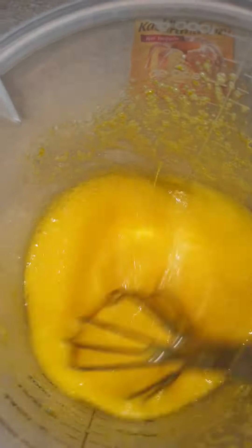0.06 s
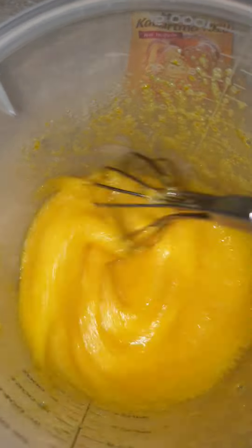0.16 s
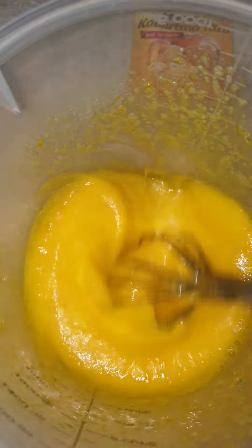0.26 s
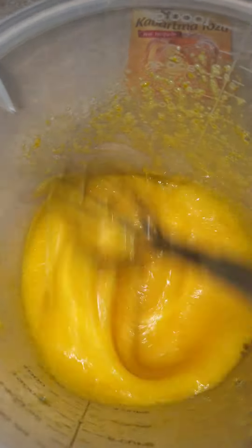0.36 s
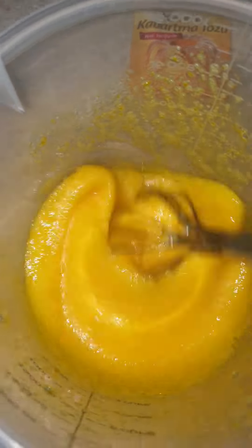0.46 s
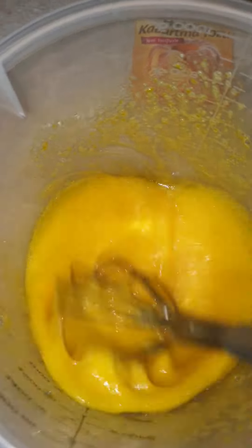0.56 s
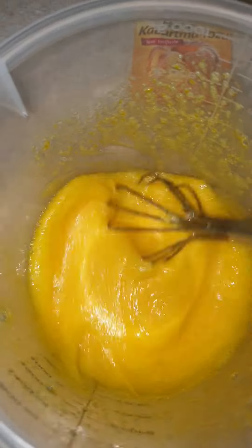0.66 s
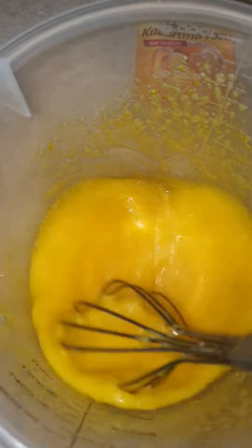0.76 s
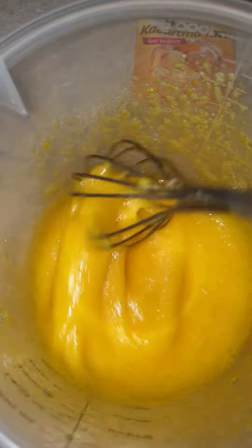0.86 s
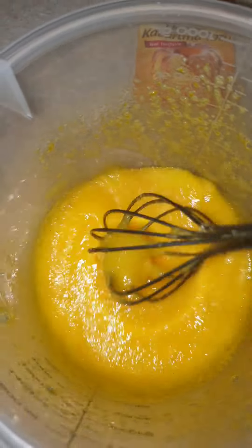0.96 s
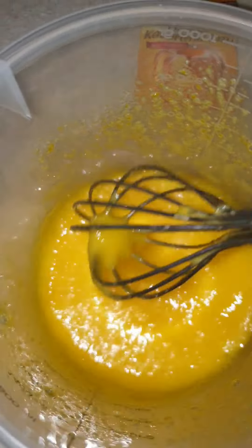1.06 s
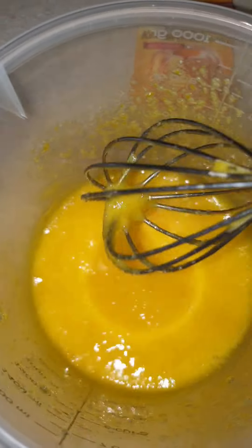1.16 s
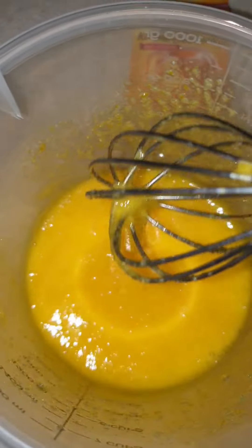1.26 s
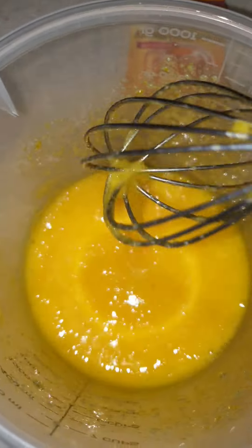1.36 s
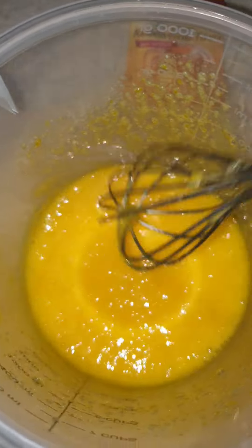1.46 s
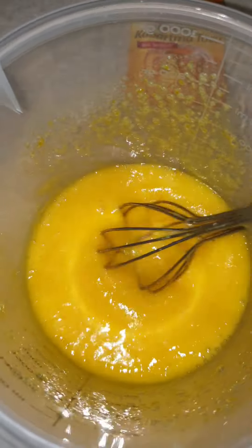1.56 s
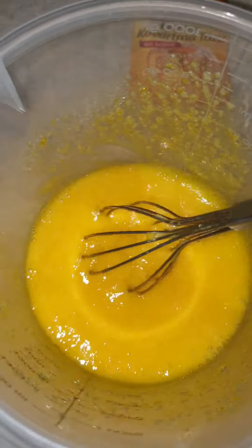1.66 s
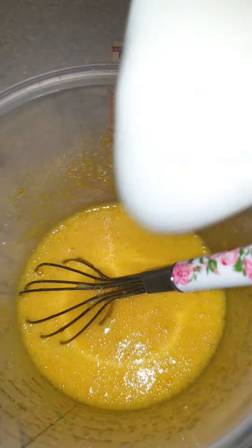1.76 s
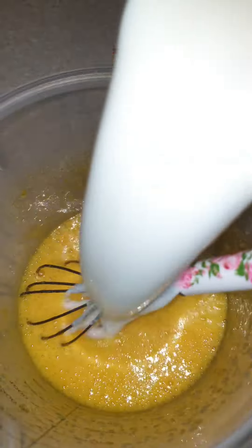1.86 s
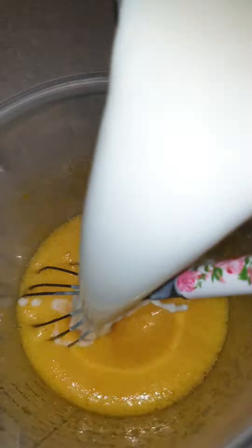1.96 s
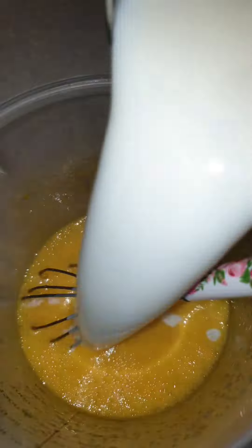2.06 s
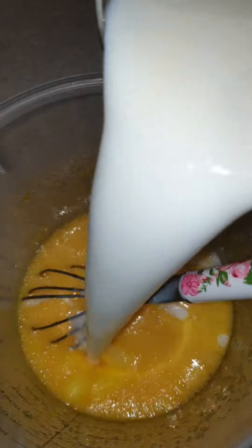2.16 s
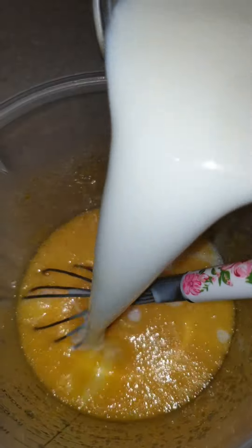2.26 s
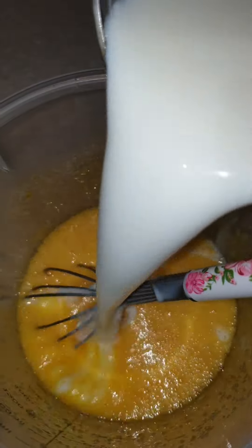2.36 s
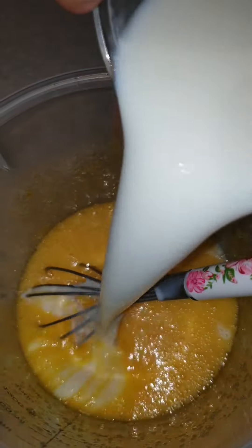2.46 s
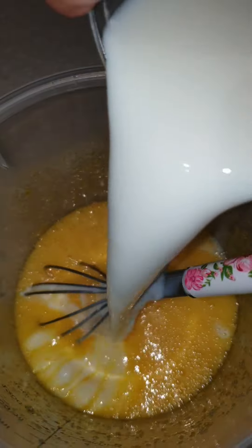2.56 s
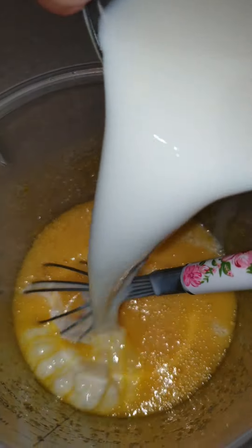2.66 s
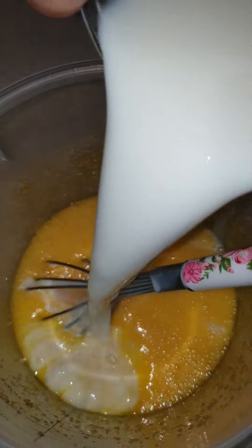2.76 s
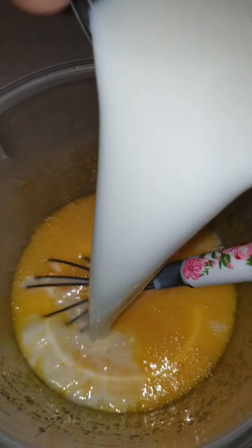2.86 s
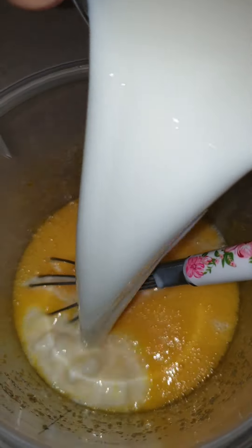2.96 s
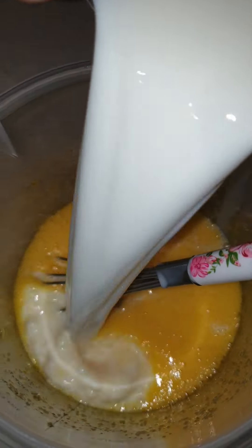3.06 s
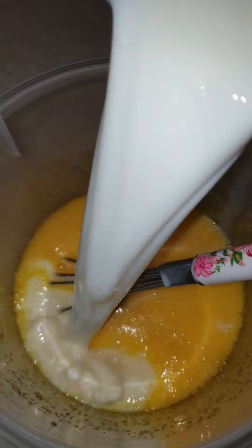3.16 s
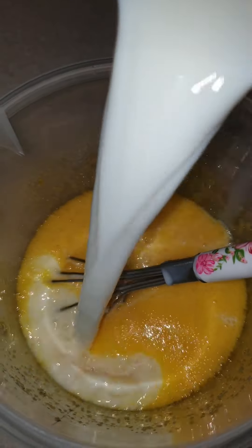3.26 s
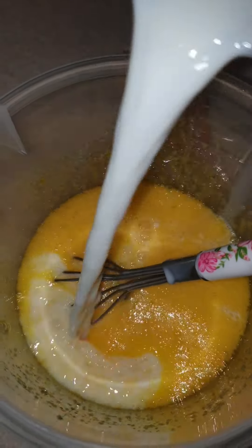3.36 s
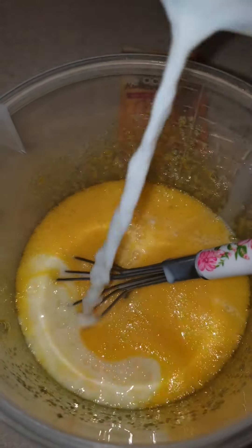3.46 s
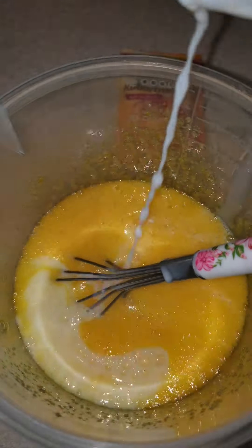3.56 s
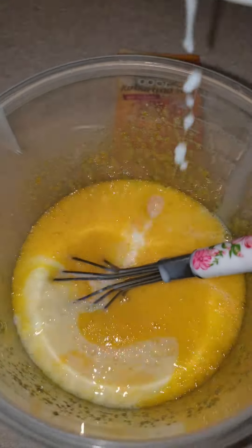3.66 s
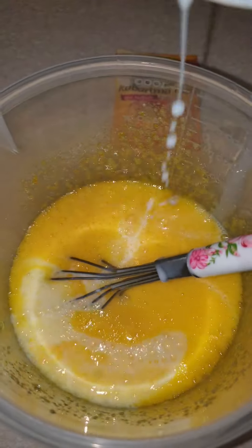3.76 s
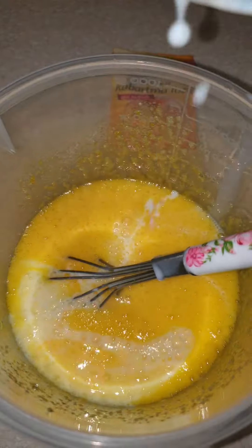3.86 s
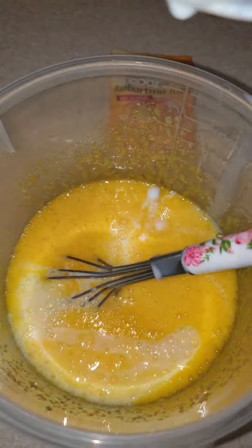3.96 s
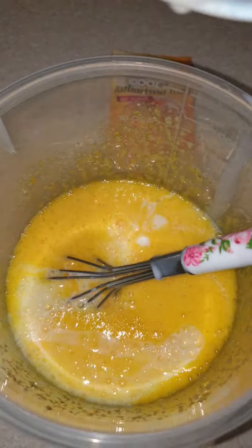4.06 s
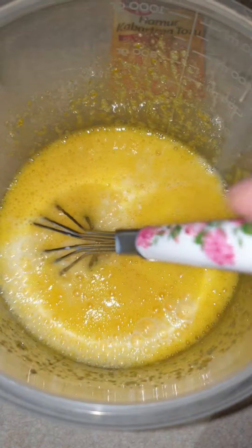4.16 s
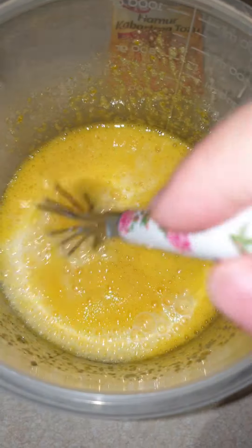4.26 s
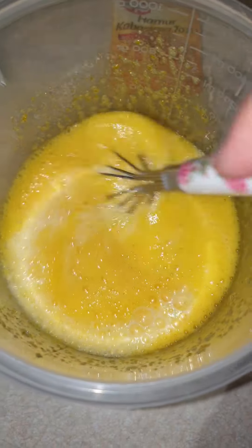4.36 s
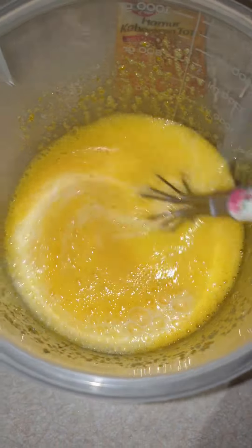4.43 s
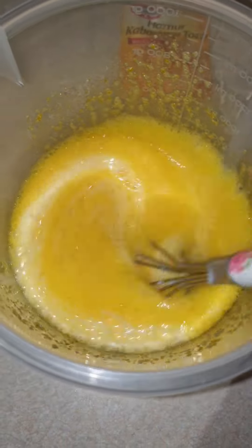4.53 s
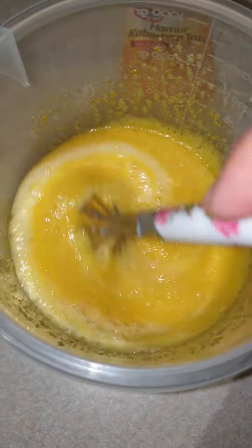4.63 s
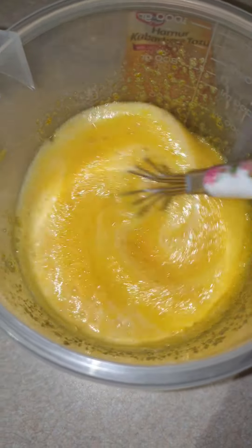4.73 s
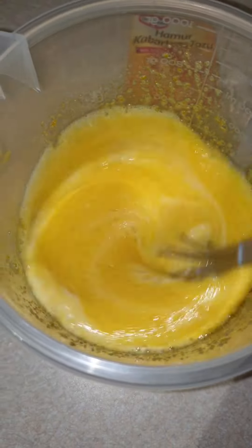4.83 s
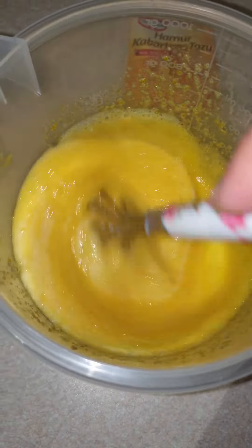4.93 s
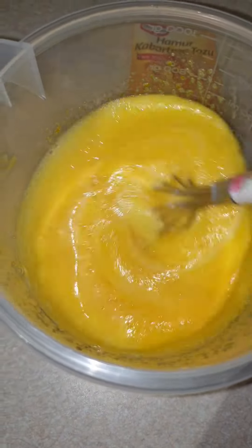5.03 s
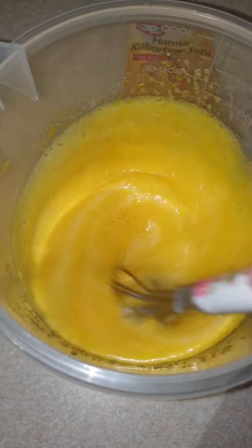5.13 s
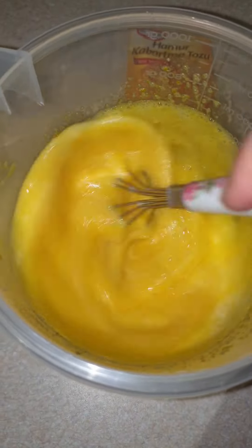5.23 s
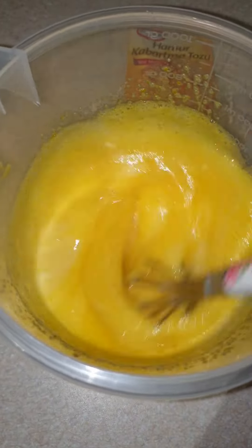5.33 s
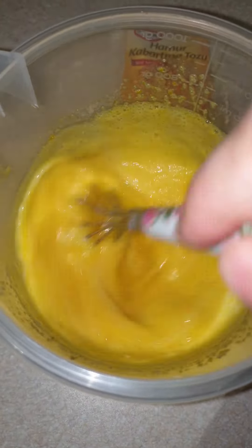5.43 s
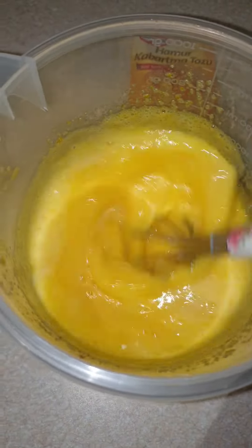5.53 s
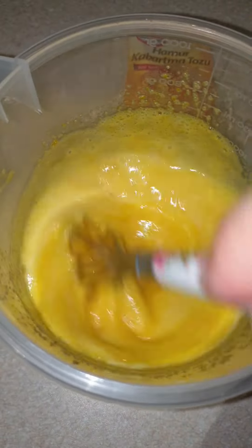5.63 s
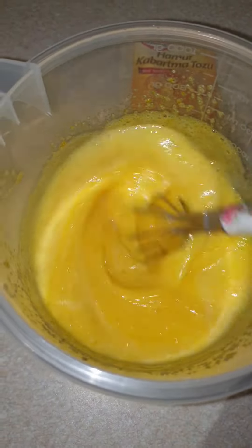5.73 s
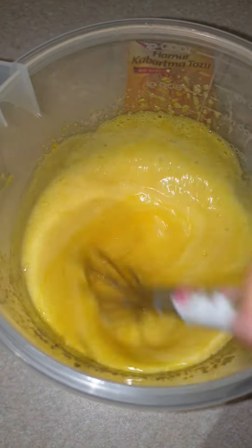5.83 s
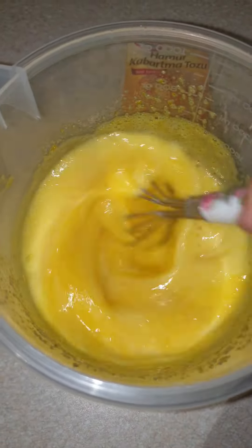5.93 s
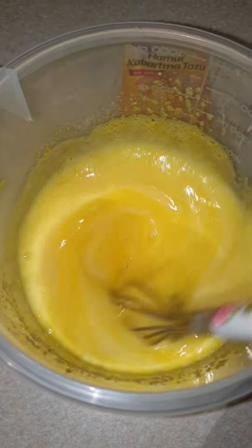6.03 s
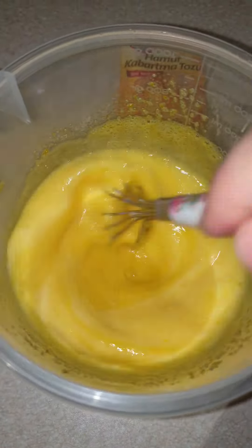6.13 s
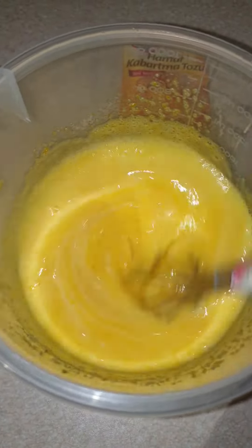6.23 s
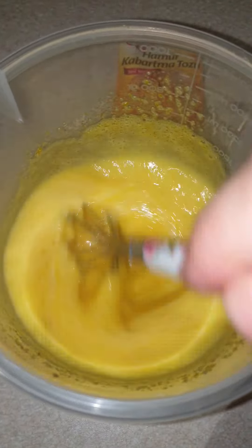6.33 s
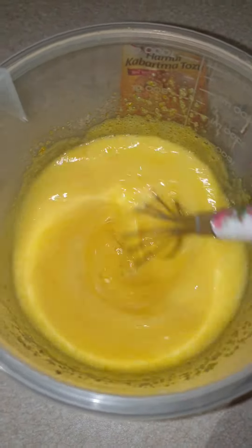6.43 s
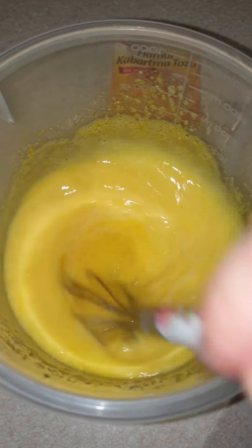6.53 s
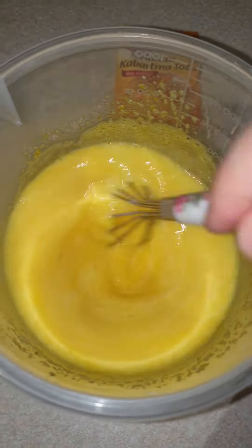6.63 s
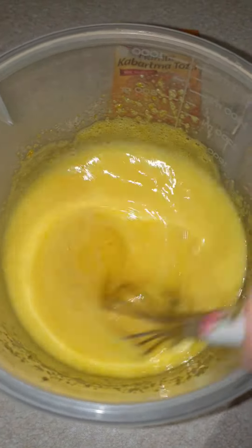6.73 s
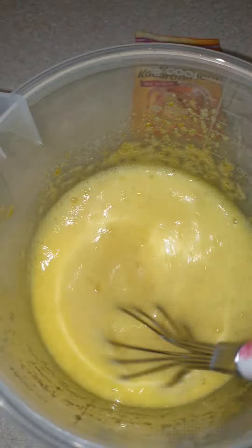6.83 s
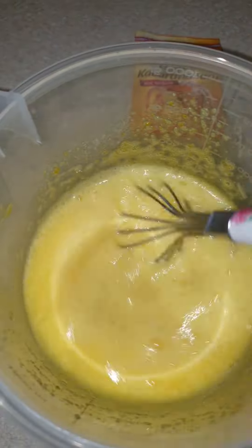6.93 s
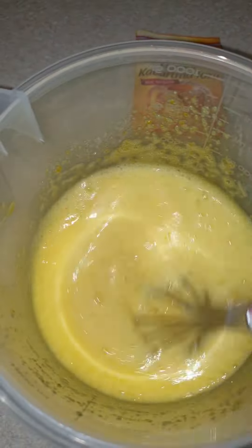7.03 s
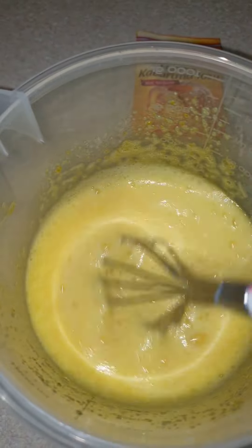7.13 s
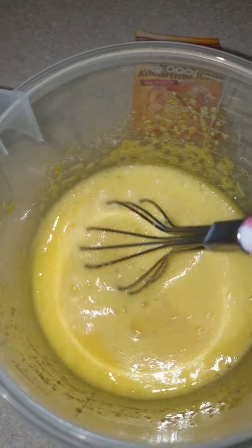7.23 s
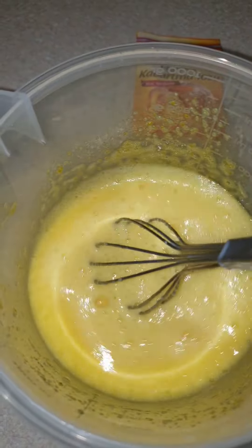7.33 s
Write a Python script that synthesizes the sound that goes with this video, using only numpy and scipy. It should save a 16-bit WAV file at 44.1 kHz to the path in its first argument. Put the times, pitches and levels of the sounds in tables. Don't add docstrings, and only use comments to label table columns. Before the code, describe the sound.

Close in a small tiled kitchen, a wire whisk beats thick egg mixture in a plastic bowl with sharp paired clacks and gritty wet fizz. It stops, knocks once more, then the scene cuts to milk gushing in with splashes, pops and crackling foam. The pour dribbles out, fingers tap lightly, and the whisk stirs the fuller bowl with duller, hollow knocks.

```python
import sys
import numpy as np
from scipy import signal
from scipy.fft import rfft, irfft
from scipy.io import wavfile
from scipy.ndimage import uniform_filter1d

SR = 44100
rng = np.random.default_rng(int(sys.argv[2]) if len(sys.argv) > 2 else 0)


def waveform_to_disk(signal):
    frames = np.transpose(np.atleast_2d(signal))
    scaled = np.clip(frames, -1, 1) * 32767
    samples = np.round(scaled).astype(np.int16)
    wavfile.write(sys.argv[1], SR, samples)


def volts(x):
    e = np.asarray(x, float) / 20
    return 10 ** e


N = 325899

# pitch in Hz, level in dB, t60 in seconds.
BOWL_LOW = [(97, -16.5, 0.11), (252, -22, 0.1), (326, -3, 0.13), (399, 6, 0.049), (475, 1.5, 0.067),
            (620, 2.5, 0.079), (680, -8.5, 0.031), (820, -13.5, 0.051)]
BOWL_MID = [(115, -13, 0.24), (310, -22.5, 0.65), (424, 4.5, 0.044), (618, 2, 0.059), (680, -0.5, 0.055),
            (782, 2.5, 0.04), (1013, -5, 0.039)]
BOWL_FULL = [(100.3, -32, 0.11), (169, -17.5, 0.091), (331, 2, 0.1), (427, 11.5, 0.11), (481, 3.5, 0.13),
             (656.6, 11.5, 0.081), (680, 12.5, 0.088), (770, 4, 0.085), (982, 1, 0.064)]
SHOTS_S = (1.7, 4.138)
# time in seconds, left minus right port in dB.
POUR_PAN = [(1.8, -6), (2.0, 2.5), (2.2, -1), (2.8, 0.5), (3.5, 5), (4.1, 12)]


def clock():
    return np.arange(N) / SR


def shot_number():
    return np.searchsorted(SHOTS_S, clock())


def add(track, at_s, sound):
    i = max(int(at_s * SR), 0)
    track[..., i:i + sound.shape[-1]] += sound[..., :N - i]


def band(x, lo_hz, hi_hz):
    return signal.sosfilt(signal.butter(3, [lo_hz, hi_hz], "bandpass", fs=SR, output="sos"), x)


def colour(x, points):
    hz, db = np.transpose(points)
    curve_db = np.interp(np.log(np.arange(513) * SR / 1024 + 1), np.log(hz), db)
    cepstrum = irfft(curve_db * np.log(10) / 20)
    cepstrum[1:512] *= 2
    cepstrum[513:] = 0
    impulse = irfft(np.exp(rfft(cepstrum)))[:512]
    return signal.fftconvolve(x, impulse)[:len(x)]


def fade(t, t60):
    return np.exp(-np.log(1000) * t / t60)


def unit(x):
    return x / np.sqrt(np.mean(x ** 2, axis=-1, keepdims=True))


def ports(pan_db):
    return volts(np.outer([1, -1], pan_db) / 2)


def pour_pan(s):
    return np.interp(s, *np.transpose(POUR_PAN))


def resonate(x, peaks):
    return np.array([volts(db) * signal.lfilter(*signal.iirpeak(hz, hz / width, fs=SR), x)
                     for hz, width, db in peaks])


def ring(modes, luck, pitch_hz, focus_db=24.0):
    detune, scatter_db, lag_s, left_db, late_s = 0.031, 3, 0.00016, -3, 0.0033
    hz, db, t60 = np.transpose(modes)[:, :, None]
    k, t = len(modes), np.arange(3400) / SR
    nearest = np.argmin(np.abs(np.log(hz / pitch_hz)))
    hz = hz * (1 + detune * luck[:k, None])
    hz[nearest] = pitch_hz
    db = db + scatter_db * luck[k:2 * k, None] - focus_db * np.abs(np.log2(hz / pitch_hz))
    tilt_db = 4.5 * luck[2 * k:3 * k, None]
    swell = fade(t, t60) * np.minimum(t / late_s * (hz / 400) ** 2, 1)
    left = volts(db + left_db + tilt_db) * swell * np.sin(2 * np.pi * hz * (t - lag_s))
    right = volts(db - tilt_db) * swell * np.sin(2 * np.pi * hz * t)
    return np.array([left.sum(0), right.sum(0)])


def strokes(table, modes, rattle_ms, tick_t60, late_db, thump_db, sheen_rel_db, pan_db,
            focus_db=22, rise_ms=0.27, count=7):
    click = 2.59
    wet_hz, wet_octaves, wet_db = 2980, 0.702, 4
    rattle, sheen, thump = np.zeros((3, 2, N))
    t = np.arange(1024) / SR
    for s, peak_db, thump_rel_db, pitch_hz in table:
        luck, land, grain = rng.standard_normal(40), rng.random(count), rng.standard_normal((2, 1024))
        land[0] = 0
        ms = rattle_ms * np.clip((peak_db + 32) / 18, .2, 1) * np.clip(-sheen_rel_db / 13, .2, 1)
        wires = np.zeros(1024)
        landing = np.clip(land * ms * SR / 1000, 0, 1023).astype(int)
        np.add.at(wires, landing, volts(2.5 * luck[-count:] + late_db * land))
        energy = signal.fftconvolve(fade(t, tick_t60) ** 2, wires ** 2)[:len(t)]
        tick = grain * np.sqrt(np.abs(energy))
        tick *= np.minimum(t * 1000 / rise_ms, 1) ** 2
        tick += click * wires * np.sign(luck[33:35, None])
        own_hz = wet_hz * 2 ** (wet_octaves * np.clip(luck[30:32], -2, 2))
        tick += resonate(tick, [(hz, hz / 8, wet_db) for hz in own_hz]).sum(0)
        tick *= volts(peak_db) * ports(pan_db) / np.abs(tick).max(axis=1, keepdims=True)
        add(rattle, s, tick)
        add(sheen, s, tick * volts(sheen_rel_db))
        weight = uniform_filter1d(wires * fade(t, 0.011), size=36)
        push = signal.fftconvolve(ring(modes, luck, pitch_hz, focus_db), weight[None])
        add(thump, s, push * volts(peak_db + thump_rel_db + thump_db) / np.abs(push).max())
    return np.array([rattle, sheen, thump])


def beat():
    # time in seconds, rattle peak in dB, thump minus rattle in dB, thump pitch in Hz.
    beat_strikes = [
        (0.187, 0.5, -30.5, 584),
        (0.4198, -3.5, -23.5, 567),
        (0.6533, -3.5, -22.5, 583),
        (0.774, -21, -20, 604),
        (1.5547, -17, -9.5, 560),
    ]
    beat_rebounds = [
        (0.001, -15.5, -16, 400),
        (0.0192, -8.5, -14.5, 456),
        (0.102, -43.5, -18.5, 355),
        (0.1212, -19, -20, 328),
        (0.2302, -4, -21, 600),
        (0.4621, -6, -23.5, 562),
        (0.5792, -27.5, -15, 335),
        (0.686, -5.5, -23.5, 310),
        (0.7894, -20.5, -23, 303),
        (1.5702, -15, -8, 316),
    ]
    # pitch in Hz, width in Hz, level in dB.
    clack_low = [(1640, 78, 2), (2540, 160, -5), (3000, 150, 3), (3330, 110, 0.5), (5180, 100, -3.5),
                 (7100, 700, -13)]
    out = strokes(beat_strikes, BOWL_LOW, rattle_ms=7.6, tick_t60=0.012, late_db=-12.5, thump_db=10.0,
                  sheen_rel_db=-22.5, pan_db=1.0, focus_db=12.5, rise_ms=1.9)
    out += strokes(beat_rebounds, BOWL_LOW, rattle_ms=4.5, tick_t60=0.016, late_db=-8.5, thump_db=8.5,
                   sheen_rel_db=-23.5, pan_db=-4.0, focus_db=12.0)
    clack = resonate(out[0], clack_low).sum(0)
    out[0] = 0.35 * band(out[0], 1700, 13000) + 0.57 * out[0] + 0.74 * clack
    return out


def stir():
    # time in seconds, rattle peak in dB, thump minus rattle in dB, thump pitch in Hz.
    stir_strikes = [(4.682, -16.5, -6, 686), (4.972, -15.5, -4.5, 660), (5.146, -26.5, -1.5, 680),
                    (5.211, -18.5, -1, 665), (5.3631, -22.5, -7.5, 960), (5.428, -24, 3.5, 644),
                    (5.4415, -18, -16, 740), (5.514, -33, -20, 685), (5.5894, -18, -8, 690),
                    (5.6714, -22.5, -3, 711), (5.8209, -19, -9.5, 680), (5.8925, -13.5, -9, 726),
                    (6.0449, -20, -9, 677), (6.1266, -12.5, -11.5, 680), (6.2624, -11.5, -8, 695),
                    (6.3675, -9, -16.5, 590), (6.511, -8.5, -18.5, 683), (6.6025, -6.5, -13.5, 652),
                    (6.7192, -23, -7.5, 404), (6.866, -10, -18.5, 643), (6.962, -11, -11.5, 680),
                    (7.092, -13, -13.5, 713)]
    stir_rebounds = [(4.4898, -26, -13, 320), (4.7063, -18, -8, 663), (4.7812, -26, -8.5, 618),
                     (4.8756, -27, -1.5, 984), (4.889, -22.5, -7.5, 605), (5.3038, -20.5, -6, 706),
                     (5.5321, -14, -13, 688), (5.5551, -11.5, -14.5, 642), (5.764, -24.5, -18, 680),
                     (5.9164, -15, -5.5, 700), (6.1538, -11, -8, 693), (6.2154, -22.5, -19, 337),
                     (6.3987, -10.5, -11.5, 615), (6.4487, -22, -14, 442), (6.4887, -19.5, -8.5, 635),
                     (6.7962, -15, -8, 424), (7.0017, -9.5, -6, 613)]
    # pitch in Hz, width in Hz, level in dB.
    clack_full = [(2030, 61, 6), (2950, 140, -8.5), (3250, 450, -2.5), (5470, 500, -2), (6650, 280, 2)]
    out = strokes(stir_strikes, BOWL_FULL, rattle_ms=9.7, tick_t60=0.024, late_db=-15.0, thump_db=6.0,
                  sheen_rel_db=-14.5, pan_db=-2.5, rise_ms=2.73)
    out += strokes(stir_rebounds, BOWL_FULL, rattle_ms=8.7, tick_t60=0.015, late_db=-3.0, thump_db=2.5,
                   sheen_rel_db=-24.0, pan_db=-1.5)
    out[0] = 0.58 * out[0] + 0.76 * resonate(out[0], clack_full).sum(0)
    return out


def touches():
    # time in seconds, peak in dB.
    light_touches = [(4.185, -49), (4.2827, -35.5), (4.344, -25.5), (4.3869, -36), (4.3944, -30.5),
                     (4.423, -36), (4.4364, -38), (4.538, -37), (4.5795, -31), (4.6157, -33), (4.6465, -37),
                     (4.8988, -22.5), (4.9374, -33), (5.019, -22), (5.218, -37), (5.2365, -25),
                     (5.3254, -30), (5.9678, -30), (6.1774, -24.5), (6.3844, -20), (6.6144, -15.5),
                     (6.6214, -20), (6.6802, -30), (6.7134, -21), (6.8051, -19), (6.8294, -22.5)]
    table = [(s, db - 3, -12, 680) for s, db in light_touches]
    return strokes(table, BOWL_FULL, rattle_ms=5.4, tick_t60=0.036, late_db=-1, thump_db=1.5,
                   sheen_rel_db=-23.5, pan_db=-1.5, rise_ms=0.55, count=3)


def bumps():
    # time in seconds, rattle peak in dB, thump minus rattle in dB, thump pitch in Hz.
    dull_bumps = [
        (1.1714, -68, 9, 697),
        (1.9076, -29.5, 0.5, 539),
        (2.23, -30.5, -11.5, 568),
        (3.44, -33, 1.5, 680),
        (4.2553, -56, 12, 424),
        (4.6244, -35, -1.5, 427),
        (5.4684, -24.5, -5.5, 690),
        (6.0037, -28.5, 3.5, 723),
        (6.0614, -26, -9, 680),
    ]
    wire_ticks = [
        (0.9219, -24, -12.5, 578),
        (2.9353, -32, 2, 690),
        (3.5641, -32.5, -2.5, 362.3),
        (4.148, -53, 11.5, 359),
        (6.736, -14.5, -16, 665),
        (6.738, -14.5, -18.5, 666),
        (7.0595, -36, 4.5, 668),
    ]
    out = strokes(dull_bumps, BOWL_MID, rattle_ms=6.9, tick_t60=0.011, late_db=-10.0, thump_db=7.5,
                  sheen_rel_db=-22.0, pan_db=-8.0, count=2)
    out += strokes(wire_ticks, BOWL_MID, rattle_ms=0.92, tick_t60=0.0077, late_db=-5.5, thump_db=6.0,
                   sheen_rel_db=-2.0, pan_db=0.5, count=2)
    return out


def splashes():
    # time in seconds, peak in dB, bowl thump minus snap in dB.
    slaps = [
        (1.844, -37, -27),
        (2.853, -29.5, -27),
        (3.5054, -35, -3),
    ]
    middling = [
        (1.8107, -43, -8),
        (1.8646, -37, -31),
        (1.9931, -22.5, -17.5),
        (2.0541, -15, -28),
        (2.1276, -18, -27.5),
        (2.2693, -17, -17.5),
        (2.4058, -33, -21),
        (2.4505, -37, -12),
        (2.7799, -17, -15.5),
        (2.9008, -31, -4.5),
    ]
    pops = [(2.2143, -16, -22), (2.314, -25, -14), (2.4715, -15, -25), (2.503, -19.5, -25),
            (2.531, -17, -27), (2.5521, -20, -22), (2.7183, -16.5, -35), (2.825, -34.5, -6),
            (3.093, -29, -31), (3.2852, -27, -15.5), (3.3672, -33, -34), (3.385, -24, -25),
            (3.426, -21, -15), (3.5401, -21, -11), (3.5782, -18.5, -14.5), (3.6248, -27.5, -25),
            (3.7598, -32, -15), (3.7782, -22.5, -18)]
    width, snap_t60, broad_db, thump_db = 1.78, 0.019, -8, 5
    snap, thump = np.zeros((2, 2, N))
    t = np.arange(1024) / SR
    for table, centre_hz in ((slaps, 2140), (middling, 6460), (pops, 12560)):
        for s, peak_db, thump_rel_db in table:
            luck, grain = rng.standard_normal(40), rng.standard_normal((2, 1024)) * fade(t, snap_t60)
            burst = unit(band(grain, centre_hz / width, min(centre_hz * width, .45 * SR)))
            burst = burst + volts(broad_db) * unit(band(grain, 3100, 14300))
            add(snap, s, burst * volts(peak_db) * ports(pour_pan(s)) / np.abs(burst).max())
            pitch_hz = np.interp(s, [1.9, 3.8], [575, 800])
            push = ring(BOWL_MID, luck, pitch_hz)
            add(thump, s, push * volts(peak_db + thump_rel_db + thump_db) / np.abs(push).max())
    return snap, thump


def plops():
    # time in seconds, peak in dB, pitch in Hz, and for the low ones t60 in seconds.
    low_plops = [(0.019, -23.5, 460, 0.029), (0.192, -24, 311, 0.1), (0.236, -26, 459, 0.11),
                 (0.419, -32, 390, 0.091), (0.651, -26, 528, 0.049), (0.685, -17.5, 310, 0.074),
                 (0.792, -27.5, 300, 0.029), (1.557, -27, 292, 0.076), (1.579, -16, 320.5, 0.093),
                 (1.855, -37, 450, 0.057), (1.907, -29.5, 433, 0.038), (4.347, -34, 487, 0.078),
                 (4.488, -33.5, 367, 0.065), (4.58, -33, 525, 0.031), (4.683, -27.5, 435, 0.11),
                 (4.973, -16.5, 384, 0.035), (5.22, -21, 411, 0.12), (5.431, -28, 460, 0.08),
                 (5.529, -32, 406, 0.034), (5.695, -25, 369, 0.097), (6.131, -30, 384, 0.09),
                 (6.158, -24.5, 326, 0.13), (6.265, -37.5, 487, 0.059), (6.373, -29, 470, 0.051),
                 (6.406, -21.5, 349, 0.031), (6.612, -15.5, 415, 0.029), (6.8, -42, 406, 0.018),
                 (7.003, -24, 424, 0.095)]
    high_plops = [(1.809, -39.5, 1710), (1.864, -29.5, 1710), (1.907, -26, 1640), (3.759, -41.5, 810),
                  (4.186, -34.5, 1105), (4.488, -35, 867), (4.537, -33, 1050), (4.625, -28.5, 770),
                  (4.685, -24, 860), (4.782, -32, 1020), (4.877, -23.5, 945), (4.892, -27.5, 990),
                  (5.305, -38, 770), (5.366, -22, 930), (5.446, -24, 1250), (5.462, -20.5, 756),
                  (5.532, -23.5, 1130), (5.552, -18.5, 1520), (5.589, -19.5, 940), (5.693, -24, 763),
                  (5.764, -30.5, 1560), (5.821, -22, 985), (5.896, -19, 814), (6.178, -17.5, 750),
                  (6.374, -28.5, 950), (6.402, -25, 794), (6.486, -24.5, 897), (6.515, -29.5, 770),
                  (6.604, -18.5, 815), (6.692, -28, 820), (6.803, -37, 840), (7.004, -22.5, 926)]
    high_t60, level_db, rise_cycles, left_db, lag_s, rough = 0.017, 2.5, 4.2, -5, 0.000061, .35
    out, t = np.zeros((2, N)), np.arange(2800) / SR
    late = t - np.array([[lag_s], [0]])
    for s, db, hz, t60 in low_plops + [(*row, high_t60) for row in high_plops]:
        swell = fade(t, np.clip(t60, .01, .1)) * np.minimum(t * hz / rise_cycles, 1)
        swell = swell * (1 + rough * unit(uniform_filter1d(rng.standard_normal(len(t)), size=30)))
        gain = volts(db + level_db + np.array([[left_db], [0]]))
        add(out, s, gain * swell / swell.max() * np.sin(2 * np.pi * hz * late))
    return out


def foam_bursts():
    # time in seconds, peak in dB, pitch in Hz, left minus right in dB.
    lone_bubbles = [(0.9223, -30, 11600, 6), (1.893, -34, 7410, -10), (1.942, -32, 7240, -5),
                    (2.0767, -29, 11200, 7), (2.1466, -33, 3020, 1), (2.191, -31, 10400, 1),
                    (2.228, -29.5, 4260, -11), (2.327, -22, 11400, 3), (2.389, -36, 3990, 5),
                    (2.5985, -33, 11400, 5), (2.6356, -36, 11100, -1), (2.661, -39, 3360, 0),
                    (2.7594, -25, 10700, 3), (2.794, -25, 10900, 1), (3.004, -44, 11000, -5.5),
                    (3.03, -35, 11700, -8.5), (3.244, -41, 11400, 1), (3.4082, -48, 12100, 1),
                    (3.4864, -38, 8650, 9), (3.5464, -27, 12500, 14), (3.6725, -43, 11400, 8),
                    (3.7313, -51, 11500, -1), (6.529, -37, 3080, -7), (6.762, -26, 6390, -3.5)]
    burst_t60, width, level_db = 0.04, 1.3, -0.5
    out, t = np.zeros((2, N)), np.arange(1024) / SR
    for s, db, hz, pan_db in lone_bubbles:
        grain = rng.standard_normal((2, 1024)) * fade(t, burst_t60)
        snap = band(grain, hz / width, min(hz * width, .45 * SR))
        snap /= np.abs(snap).max(axis=1, keepdims=True)
        add(out, s, snap * volts(db + level_db) * ports(pan_db))
    return out


def jug_knocks():
    # time in seconds, level in dB, contact in ms.
    taps = [
        (3.8933, -26.5, 0.51),
        (4.003, -39.5, 2.8),
        (4.0333, -27, 0.52),
        (4.102, -31.5, 0.96),
    ]
    out = np.zeros((2, N))
    for s, db, ms in taps:
        n = int(ms * SR / 1000)
        push = np.concatenate([np.hanning(n), -0.25 * np.hanning(2 * n)])
        add(out, s, volts(db) * ports(8) * push)
    return out


def jug_rubs():
    # start in seconds, length in seconds, level in dB.
    slides = [
        (3.936, 0.036, -57),
        (4.023, .05, -45.5),
    ]
    out = np.zeros((2, N))
    for s, length, db in slides:
        n = int(length * SR)
        rustle = unit(band(rng.standard_normal((2, n)) ** 3, 390, 1930))
        add(out, s, volts(db) * ports(6) * np.hanning(n) ** .5 * rustle)
    return out


def scrapes():
    # start in seconds, length in seconds, grit in dB, bowl in dB.
    drags = [(1.572, 0.2, -67.5, -52.5), (1.851, 0.021, -41, -47), (3.404, 0.074, -57, -51),
             (3.479, 0.12, -53, -47.5), (4.34, 0.025, -45, -34), (4.366, 0.093, -75, -46),
             (4.471, 0.056, -49, -43.5), (4.58, 0.023, -56, -41.5), (4.799, 0.028, -44, -35),
             (5.036, 0.087, -42.5, -48), (5.216, 0.046, -42.5, -46), (5.269, 0.083, -48, -41.5),
             (5.501, 0.1, -40.5, -37), (5.664, 0.057, -39.5, -33.5), (5.737, 0.078, -44.5, -43),
             (5.953, 0.094, -41.5, -43), (6.127, 0.063, -36.5, -40), (6.203, 0.09, -42, -46),
             (6.364, 0.038, -29, -28), (6.469, 0.074, -33.5, -39), (6.62, 0.18, -42, -45),
             (6.739, 0.12, -45, -43), (7.009, 0.076, -43, -58)]
    out = np.zeros((3, 2, N))
    for s, length, grit_db, bowl_db in drags:
        sheen_db = -48.5 + 1.26 * (grit_db + 46)
        pouring = SHOTS_S[0] < s < SHOTS_S[1]
        pan_db = 2.34 * pour_pan(s) if pouring else -3.5
        swell = np.hanning(int(length * SR)) ** 0.45
        add(out, s, volts([grit_db, sheen_db, bowl_db])[:, None, None] * ports(pan_db) * swell)
    return out


def batter_motion():
    # time in seconds, motion in dB below full.
    beaten = [(0, -3), (.4, -9.5), (.86, -10), (1.21, -19.5), (1.3, -49), (1.55, -35), (1.6, -12),
              (1.695, -17)]
    first_gush = [(1.71, -20), (1.84, -9.5), (1.88, -0.5), (2.15, 2.5), (2.25, -2.5), (2.33, 0.5),
                  (2.56, 2.5), (2.66, -10.5)]
    second_gush = [(2.72, 3), (2.94, -1.5), (2.97, -7.5), (3.38, -15.5), (3.62, -10), (3.7, -41),
                   (3.85, -15), (4.135, -20)]
    stirred = [(4.14, -7.5), (4.33, -6), (4.42, 2.5), (4.95, 3.5), (5.4, -6), (5.9, 5), (6.57, 4),
               (7.12, -4.5), (7.39, -17)]
    return np.interp(clock(), *np.transpose(beaten + first_gush + second_gush + stirred))


def specks(rate, spread_db):
    sizes = (rng.random(N) < rate / SR) * volts(spread_db * np.minimum(rng.exponential(size=N), 3.5))
    return unit(signal.lfilter([1], [1, -np.exp(-1 / (.0012 * SR))], sizes))


def patches(count):
    t, knots = clock(), np.arange(0, N / SR, 0.018)
    luck = rng.standard_normal((count, len(knots)))
    depth_db = np.choose(shot_number(), (3.2, 4, 2.5))
    return np.array([volts(depth_db * np.interp(t, knots, row)) for row in luck])[:, None]


def pour_air(smack):
    # pitch in Hz, width in Hz, level in dB.
    air_rings = [(1800, 190, 2), (2510, 380, -0.47), (2890, 100, -1.7), (4060, 2000, 1.4)]
    rings = resonate(smack, air_rings) * patches(len(air_rings))
    return unit(0.5 * smack + np.sum(rings, axis=0))


def bubbles(motion, count=300):
    centre_hz, octaves, ring_cycles, glide, level_db = 1150, .8, 22, .15, -1.5
    out, t = np.zeros((2, N)), np.arange(1200) / SR
    for s, size, luck_db, pan_db in zip(rng.random(count) * N / SR, *rng.standard_normal((3, count))):
        cycles = t * np.clip(centre_hz * 2 ** (octaves * size), 180, 5200)
        blip = np.sin(2 * np.pi * cycles * (1 + glide * cycles / ring_cycles / 2))
        blip *= fade(cycles, ring_cycles) * np.minimum(cycles / 1.9, 1)
        gain = volts(level_db + 6.9 * luck_db) * ports(5.2 * pan_db)
        add(out, s, motion[:, int(s * SR), None] * gain * blip)
    return out


def batter():
    # level at full motion in dB, dB per dB of motion, level at rest in dB.
    slosh_law = [(-31, 3.5, -90), (-52.5, 1, -72), (-58, 1.45, -85)]
    smack_law = [(-43, 1.51, -85.5), (-48.5, 1.53, -79.5), (-57.5, 1.75, -94.5)]
    grit_law = [(-44.5, 1.1, -96.5), (-47, 1.66, -64), (-57, 1.25, -99)]
    fizz_law = [(-44.5, 1.9, -82.5), (-50.5, 3.3, -59.5), (-59.5, 1.24, -82)]
    speckle = (0.22, 0.92, 0.42)
    wetness = (.3, 1.1, 1.1)
    shot, motion_db = shot_number(), batter_motion()
    law_row = np.searchsorted([1.84, SHOTS_S[1]], clock())

    def level(law):
        full_db, slope, rest_db = np.array(law)[law_row].T
        return volts(full_db + slope * motion_db) + volts(rest_db)

    common = specks(60, 2.6)

    def grains(rate, lo_hz, hi_hz):
        envelope = np.choose(shot, speckle) * (specks(rate, 4.3) + .5 * common) + 1
        return unit(band(envelope * rng.standard_normal((2, N)), lo_hz, hi_hz))

    smack, grit, fizz = grains(90, 1000, 4300), grains(120, 5300, 7900), grains(160, 9600, 14000)
    poured = pour_air(smack)
    smack, grit, fizz = np.array([smack, grit, fizz]) * patches(3)
    smack = np.where(shot == 1, poured, smack)
    drag, drag_sheen, drag_bowl = scrapes()
    treble = (level(smack_law) + drag) * smack
    treble += (0.86 * level(grit_law) + 0.89 * drag) * grit
    treble += (level(fizz_law) + drag_sheen) * fizz
    treble *= ports((shot == 1) * (pour_pan(clock()) + 2.8))

    lumps = (specks(230, 2.1) + .5) * rng.standard_normal(N)
    bowls = [ring(modes, np.zeros(40), modes[4][0], focus_db=-2.0) for modes in (BOWL_LOW, BOWL_MID, BOWL_FULL)]
    slosh = np.choose(shot, [unit(signal.fftconvolve(bowl, lumps[None])[:, :N]) for bowl in bowls])
    push = level(slosh_law) + drag_bowl
    return treble, push * slosh + bubbles(push * np.choose(shot, wetness))


def gurgle():
    # start in seconds, length in seconds, from Hz, to Hz, level in dB.
    pockets = [
        (1.96, .135, 1420, 1780, -43),
        (2.86, .11, 680, 900, -46),
        (2.95, .48, 760, 830, -59),
        (2.15, .16, 570, 590, -48),
    ]
    out = np.zeros((2, N))
    for s, length, from_hz, to_hz, db in pockets:
        n = int(length * SR)
        rough = unit(uniform_filter1d(rng.standard_normal((2, n)), size=300))
        whistle = np.sin(2 * np.pi * np.cumsum(np.linspace(from_hz, to_hz, n)) / SR)
        add(out, s, volts(db) * np.hanning(n) ** .5 * (0.37 + rough) * whistle)
    return out


def worktop(thump):
    # time in seconds, level in dB.
    thuds = [
        (1.559, -38),
        (3.55, -58),
        (3.78, -59),
        (3.889, -56),
        (4.03, -52),
        (4.1, -57),
        (0.931, -57),
        (2.12, -55),
        (6.76, -45.5),
    ]
    thud_t60, level_db, hold_s = 0.42, -23.5, 0.025

    def noise(own, lo_hz, hi_hz):
        return unit(band(rng.standard_normal(N) + own * rng.standard_normal((2, N)), lo_hz, hi_hz))

    t, keep = np.arange(SR) / SR, np.exp(-1 / (hold_s * SR))
    energy = signal.lfilter([1 - keep], [1, -keep], np.mean(thump ** 2, axis=0))
    linger = volts(level_db) * np.sqrt(energy)
    level = linger.copy()
    for s, db in thuds:
        add(level, s, volts(db) * fade(t, thud_t60) * np.minimum(t / .012, 1))
    rumble = noise(.4, 78, 112) * ports(2.6) + .7 * noise(.6, 32, 210)
    return level * rumble + 2.24 * linger * noise(0.5, 145, 340)


def kitchen(x):
    # octave from Hz, t60 in seconds.
    tails = [(250, 0.41), (500, 0.3), (1000, 0.39), (1950, 0.26), (3900, 0.21), (9300, 0.2)]
    out, noise = 0, rng.standard_normal((2, N))
    for hz, t60 in tails:
        keep = np.exp(-2 * np.log(1000) / (t60 * SR))
        energy = signal.lfilter([1 - keep], [1, -keep], band(x, hz, 2 * hz) ** 2)
        level = np.sqrt(np.abs(uniform_filter1d(energy, size=301, origin=150)))
        out = out + level * unit(band(noise, hz, 2 * hz))
    return volts(-11.5) * out


def room_hum():
    low = unit(band(rng.standard_normal((2, N)), 35, 75))
    return volts(-70.5) * (low + 0.48 * unit(band(rng.standard_normal((2, N)), 130, 600)))


def at_ports(x):
    # frequency in Hz, level in dB.
    left_port = [(1000, -7.5), (1800, -0.5), (3000, -8), (4200, -4), (6500, -15), (8000, -12), (9500, -1.5),
                 (11300, -6), (15500, -8)]
    right_port = [(1000, 7), (1800, 1), (3100, 3), (4200, -2.5), (6500, 3.5), (8200, -10), (9500, -14.5),
                  (11400, 5.5), (13000, -8), (15500, -13.5)]
    return np.array([colour(x[0], left_port), colour(x[1], right_port)])


def scene():
    rattle, sheen, thump = beat() + stir() + bumps() + touches()
    ticks = volts(7.0) * band(rattle, 610, 7200) + volts(25) * band(sheen, 6700, 21000)
    snap, nudge = splashes()
    snap = snap + foam_bursts() + jug_knocks() + jug_rubs()
    thump = thump + nudge + plops()
    fizz, slosh = batter()
    struck = at_ports(ticks) + snap + band(thump, 130, 5300)
    steady = at_ports(fizz) + band(slosh, 130, 4600) + worktop(thump) + gurgle()
    return struck + kitchen(struck) + steady + room_hum()


def band_limit(x):
    return signal.sosfilt(signal.butter(12, 16820, fs=SR, output="sos"), x)


def record(dry):
    cut_s = (1.699, 1.712)
    dropout_s = (6.753, 6.762)
    t = clock()
    gate = np.interp(t, [cut_s[0] - .003, cut_s[0], cut_s[1] - .004, cut_s[1]], [0.99, 0.012, 0.01, 0.85])
    gate *= np.interp(t, [dropout_s[0] - .006, dropout_s[0], dropout_s[1] - .001, dropout_s[1]],
                      [0.93, 0.36, 0.062, 1])
    thin = signal.sosfilt(signal.butter(2, 39.5, "highpass", fs=SR, output="sos"), dry * gate)
    mix = signal.sosfilt(signal.ellip(8, .2, 60, 15900, fs=SR, output="sos"), thin)
    return band_limit(np.clip(mix, -1, 1))


dry = scene()
out = record(dry)
waveform_to_disk(out)
```